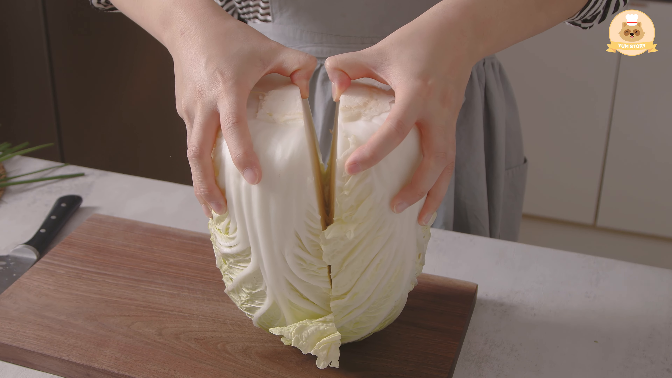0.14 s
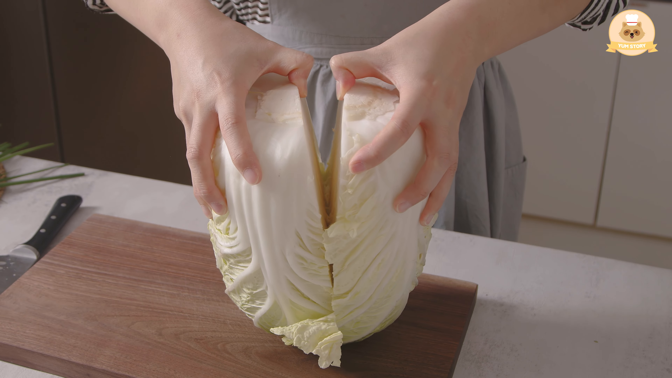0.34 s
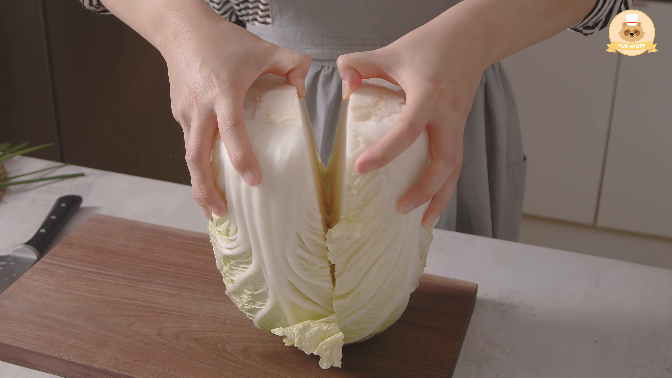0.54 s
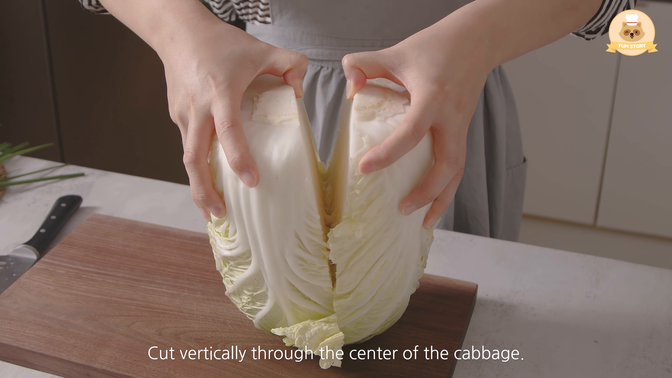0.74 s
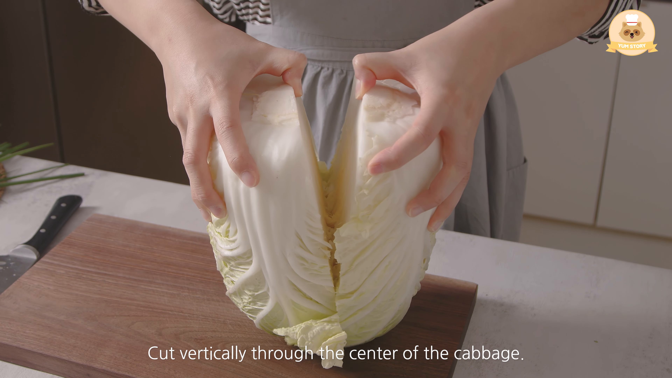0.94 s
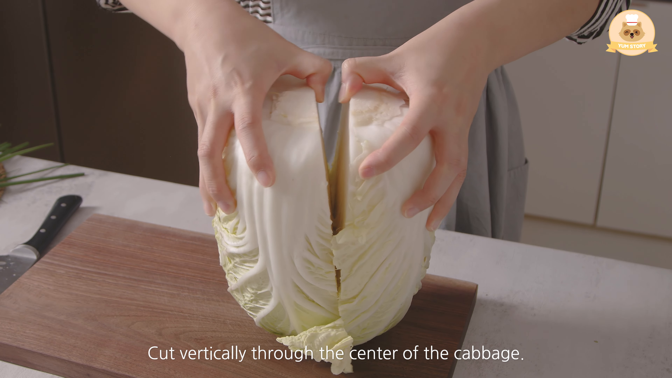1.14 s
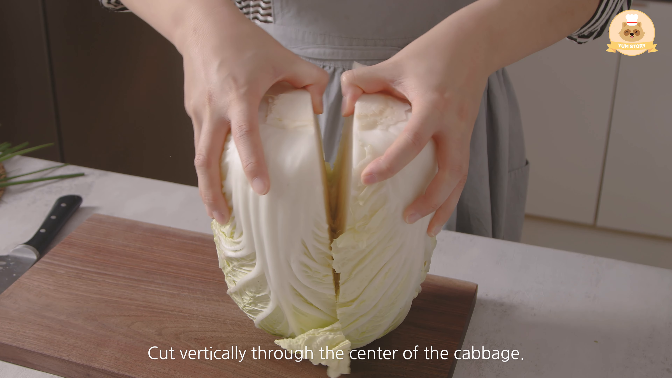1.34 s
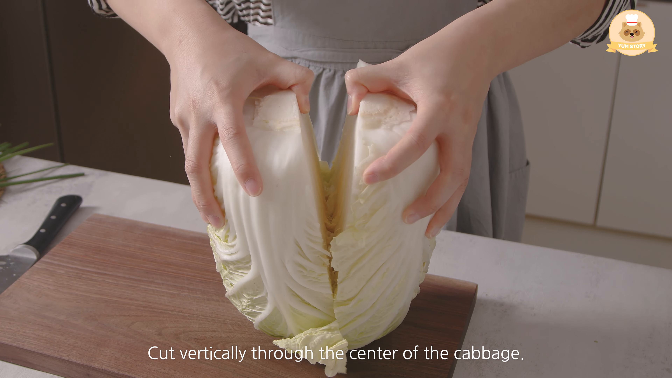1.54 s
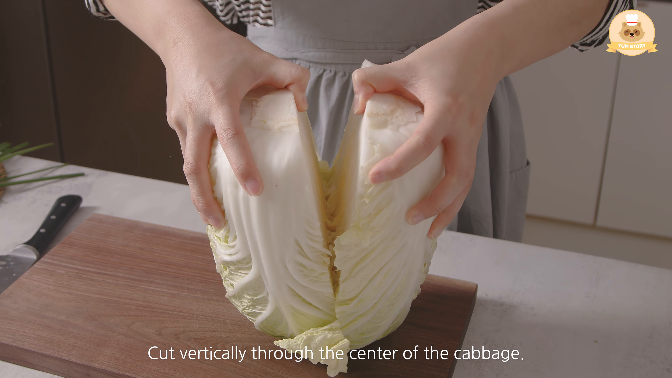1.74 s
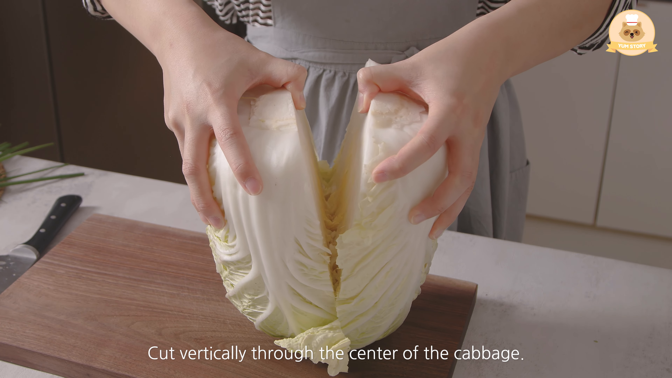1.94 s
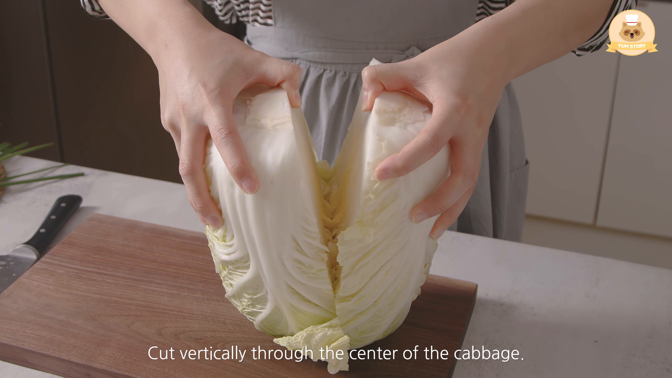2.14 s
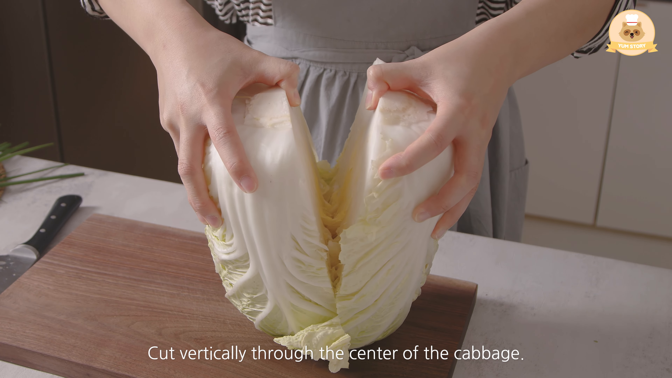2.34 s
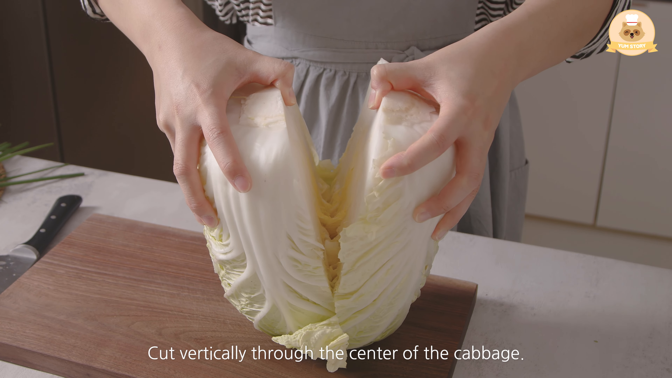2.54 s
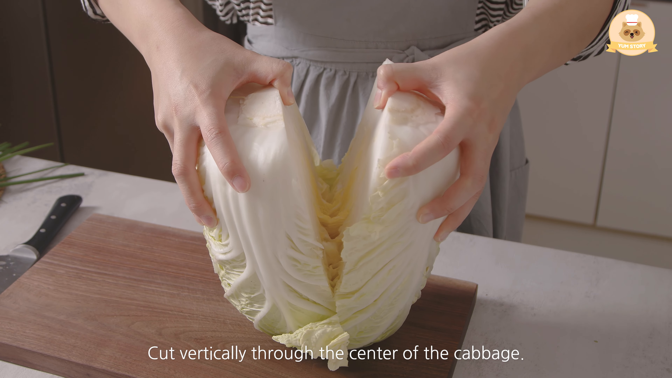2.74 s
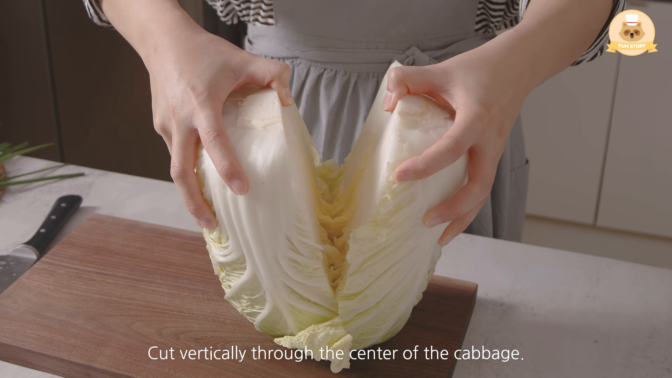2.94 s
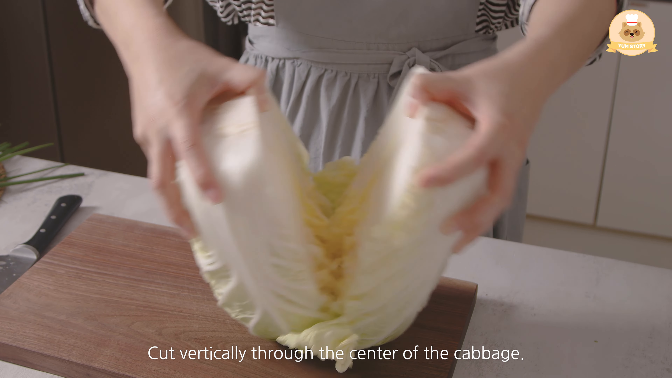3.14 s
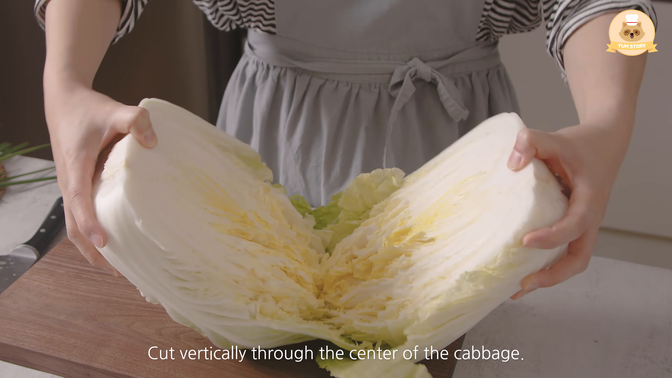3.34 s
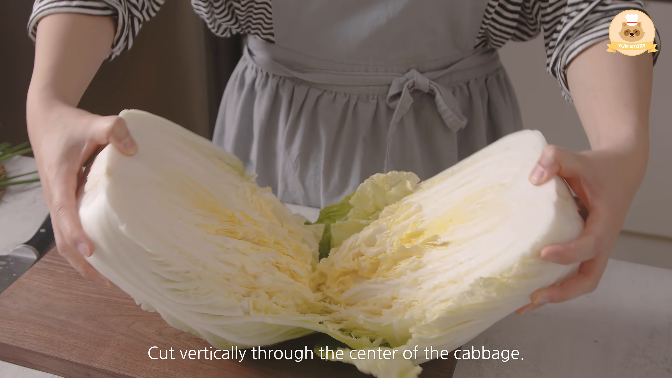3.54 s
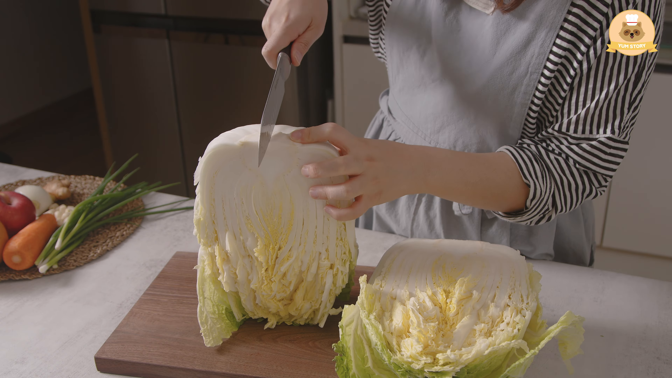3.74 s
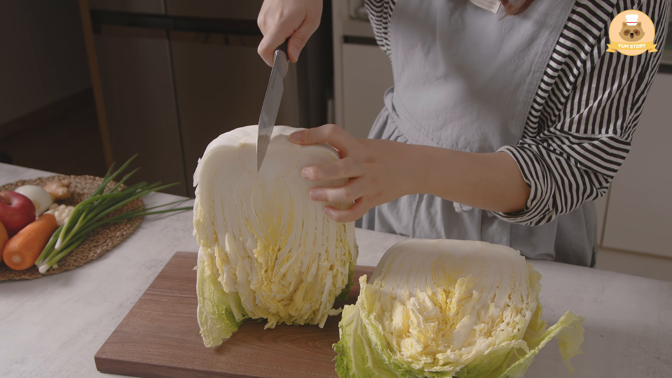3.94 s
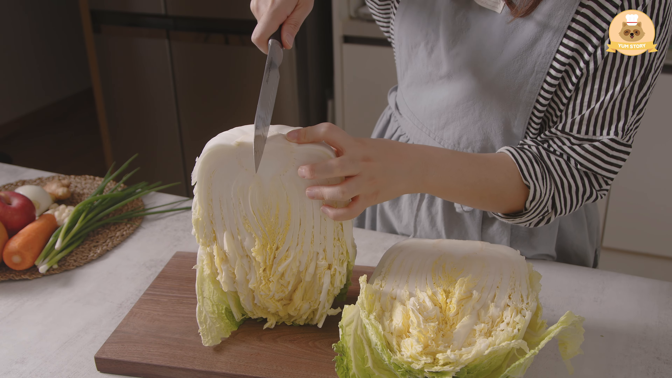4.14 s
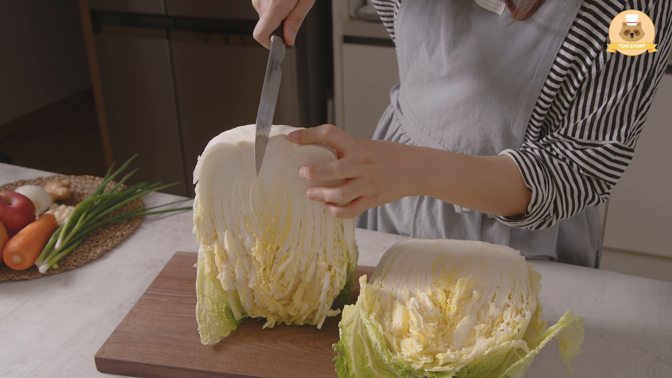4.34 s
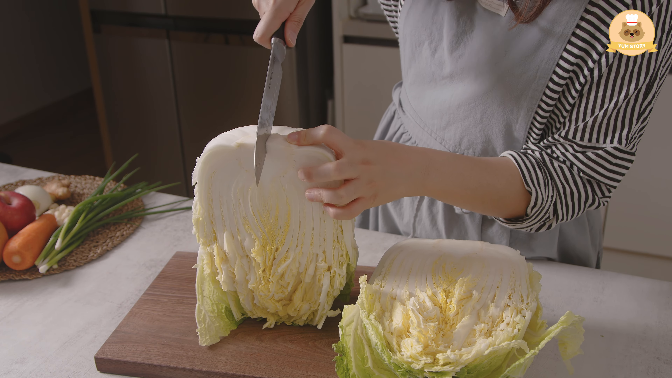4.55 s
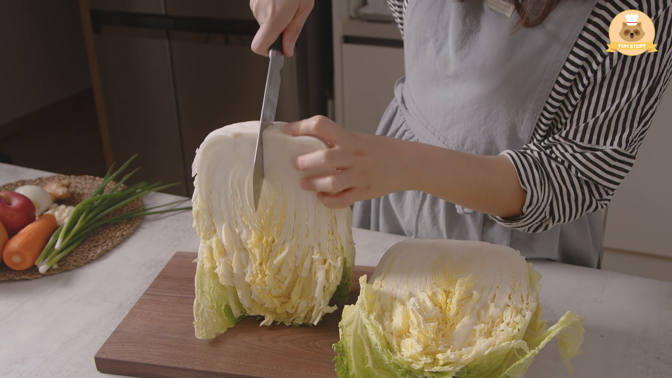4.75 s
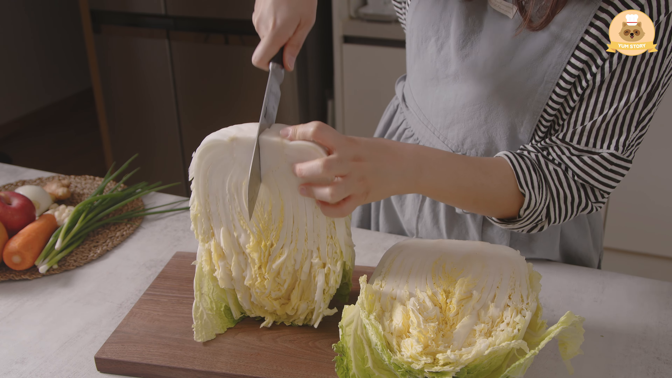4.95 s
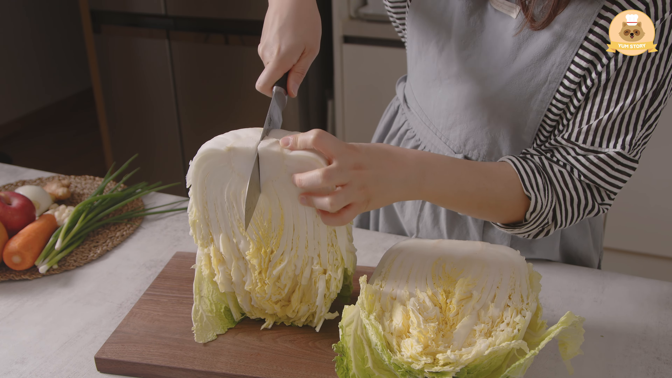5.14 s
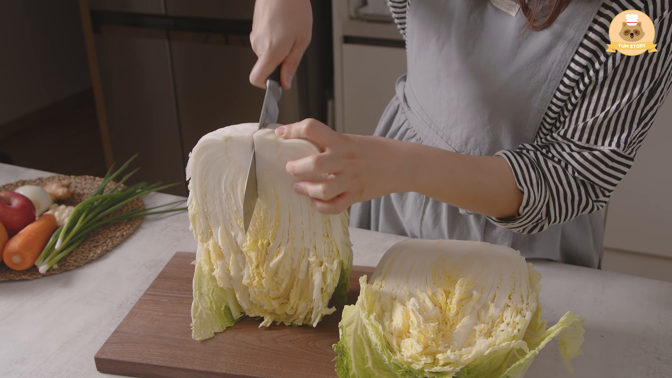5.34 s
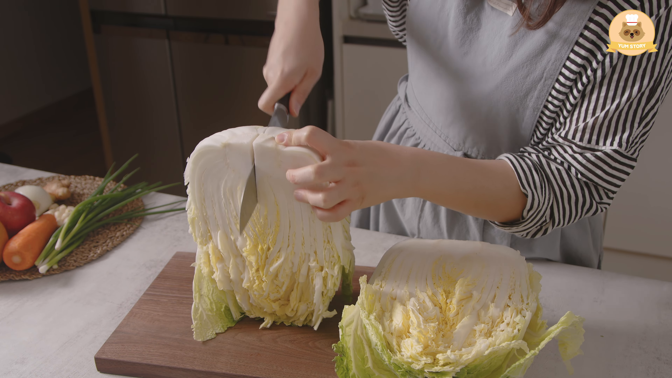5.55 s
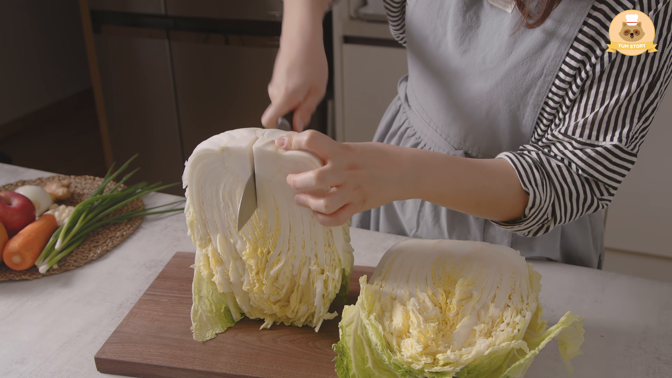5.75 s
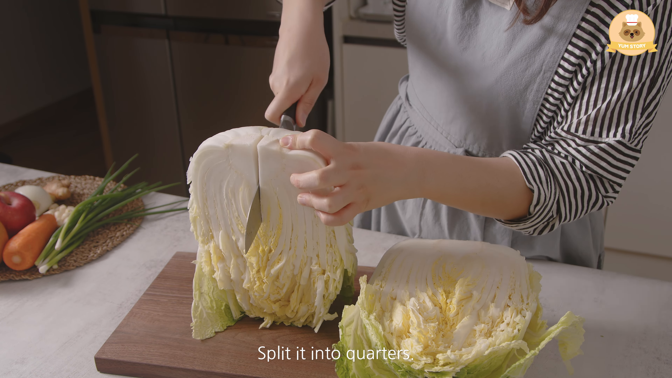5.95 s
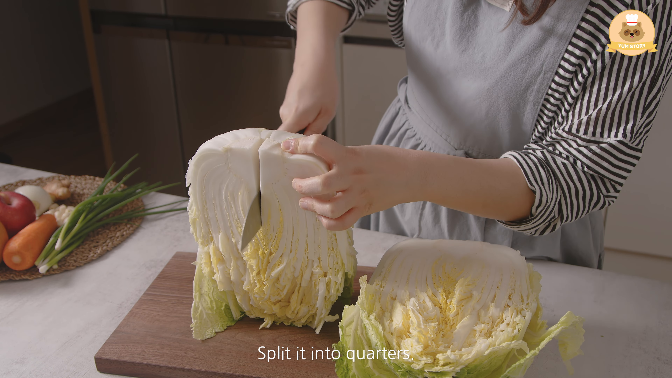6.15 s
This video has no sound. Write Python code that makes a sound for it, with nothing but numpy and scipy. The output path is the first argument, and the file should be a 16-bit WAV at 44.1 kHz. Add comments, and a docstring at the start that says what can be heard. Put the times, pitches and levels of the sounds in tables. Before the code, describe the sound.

Hands pull a large cabbage apart in a quiet kitchen. Its ribs snap and its leaves tear in irregular crisp spurts, with small hollow pops from inside the head. The cracking builds to one loud crunching rip, followed by a brief leaf creak. Then a knife ticks lightly against the core with a faint metallic ring and slices down in several softer, hissing, crunchy strokes. Everything sounds close, over a very faint fridge hum.

```python
"""Tearing and slicing a cabbage

Hands pull a big cabbage apart on a board: ribs snap by brittle fracture, leaves tear and creak by
stick-slip, and the hollow head thuds. The scene changes abruptly to a knife that ticks on the core,
rings faintly in its bending modes and slices down in strokes. A near wall echoes each snap,
the microphone stand sways, and a fridge hums in the kitchen."""
import sys
import numpy as np
from scipy import signal
from scipy.fft import rfft, irfft, next_fast_len
from scipy.io import wavfile
from scipy.ndimage import uniform_filter1d

SR = 44100
rng = np.random.default_rng(int(sys.argv[2]) if len(sys.argv) > 2 else 0)


def file_out(sig):
    """Save sig as 16-bit WAV at sys.argv[1]."""
    # one column per channel
    cols = np.atleast_2d(sig).T
    # limit, then scale
    lim = np.clip(cols, -1, 1)
    pcm = np.round(lim * 32767).astype(np.int16)
    wavfile.write(sys.argv[1], SR, pcm)


N = 272979
TIME = np.arange(N) / SR
KNIFE_START_S = 3.78

# spectrum of tissue breaking under the hands: f/Hz, spectral level/dB
TEAR_SPECTRUM = [(1880, -44), (3200, -9.5), (4450, -7), (4800, -3.5), (6670, -1), (9790, -12.5),
                 (12100, -12.5), (13900, -19.5), (15800, -27.5), (16500, -37)]


def amp(db):
    """Amplitude ratio of a level in decibels."""
    return 10 ** (np.asarray(db) / 20)


def unit(x):
    """Normalisation to an rms of 1."""
    return x / np.sqrt(np.mean(x ** 2) + 1e-20)


def along(points, hz):
    """Interpolation of (f, value) points on a logarithmic frequency axis."""
    f, values = np.transpose(points)
    return np.interp(np.log(hz + 1), np.log(f + 1), values)


def curves(rows):
    """Linear interpolation in time: one curve for each column after t."""
    times, *columns = np.transpose(rows)
    return [np.interp(TIME, times, column) for column in columns]


def filtered(x, response):
    """Linear filtering: the spectrum is multiplied by a frequency response."""
    size = next_fast_len(N + SR // 2)
    return irfft(rfft(x, size) * response(np.fft.rfftfreq(size, 1 / SR)), size)[:N]


def shaped_noise(spectrum):
    """Spectral shaping of white noise, at an rms of 1."""
    return unit(filtered(rng.standard_normal(N), lambda f: amp(along(spectrum, f))))


def minimum_phase(x, spectrum):
    """Minimum-phase filtering: folding the cepstrum gives the most compact causal response."""
    magnitude = np.maximum(amp(along(spectrum, np.fft.rfftfreq(2048, 1 / SR))), 1e-4)
    cepstrum = irfft(np.log(magnitude))
    cepstrum[1:1024] *= 2
    cepstrum[1025:] = 0
    impulse = irfft(np.exp(rfft(cepstrum)))[:1024]
    return signal.fftconvolve(x, impulse / np.linalg.norm(impulse))[:N]


def resonate(x, modes):
    """Modal superposition: x drives damped resonators in parallel."""
    return filtered(x, lambda f: sum(amp(db) * 1j * f * width / (hz * hz - f * f + 1j * f * width)
                                     for hz, width, db in modes))


def swells(start, hold, rise, fall, floor_db, *levels_db):
    """Power summation of events that rise, hold and fall (dB/s) over a floor; a gain per level column."""
    t = np.arange(0, N / SR + .002, .001)[:, None]
    shape_db = -rise * np.maximum(start - t, 0) - fall * np.maximum(t - start - hold, 0)
    powers = [amp(2 * floor_db) + amp(2 * (shape_db + db)).sum(axis=1) for db in levels_db]
    return [np.interp(TIME, t[:, 0], np.sqrt(power)) for power in powers]


def kitchen():
    """Background noise: steady air, a hiss that is stronger in the knife scene, and the fridge's tones."""
    # air noise and faint hiss: f/Hz, spectral level/dB
    air_spectrum = [(20, -17), (40, -6.5), (120, -14), (180, -17), (270, -3), (340, -10), (455, -5.5),
                    (610, -24), (1000, -35.5), (1320, -28.5), (1600, -36), (4000, -50.5), (16000, -63.5)]
    hiss_spectrum = [(2000, -32), (4500, -13), (7300, 0.5), (9000, -10), (16000, -2.5)]
    # fridge tones: f/Hz, rms level/dB
    tones = [(60, -73.5), (119, -77), (1330, -83.5)]
    air = amp(-67) * shaped_noise(air_spectrum)
    hiss = amp(np.where(TIME < KNIFE_START_S, -89.5, -75)) * shaped_noise(hiss_spectrum)
    phase_drifts = 0.0069 * np.cumsum(rng.standard_normal((len(tones), N)), axis=1)
    hum = sum(np.sqrt(2) * amp(db) * np.sin(2 * np.pi * hz * TIME + drift)
              for (hz, db), drift in zip(tones, phase_drifts))
    return air + hiss + hum


def grains(per_s, spread_db, life_s, hiss):
    """Shot noise: tiny fractures at random moments, each a decaying burst with echoes, over smooth hiss."""
    onsets = rng.random(N) < per_s / SR
    sizes = onsets * amp(spread_db * np.minimum(rng.exponential(size=N), 3))
    bursts = signal.lfilter([1], [1, -np.exp(-1 / (life_s * SR))], wall_echoes(sizes))
    return (unit(bursts) + hiss) / np.sqrt(1 + hiss ** 2) * rng.standard_normal(N)


def fracture_gains(events, fall_db_per_s, floor_db):
    """Exponential envelopes of crackle, crunch and thud; the last two decay a little more slowly."""
    start, hold, db, rise, crunch_db, thud_db = np.transpose(events)
    crackle = swells(start, hold, rise, fall_db_per_s, floor_db, db)
    body = swells(start, hold, rise, 0.91 * fall_db_per_s, floor_db, db + crunch_db, db + thud_db)
    return *crackle, *body


def flesh(gains, crackle_spectrum, crunch_spectrum, per_s, spread_db, hiss):
    """Source and filter: one stream of fractures sounds in the air, the crisp ribs and the hollow head."""
    # resonances of the head: f/Hz, bandwidth/Hz, level/dB
    head_modes = [(185, 30, 0), (272, 55, 5.5), (355, 56.1, 4), (438, 11, -10.5)]
    crackle_gain, crunch_gain, thud_gain = gains
    merged = hiss * (crackle_gain / amp(-48)) ** 0.28  # harder tearing merges the fractures into hiss
    fractures = grains(per_s, spread_db, life_s=0.00038, hiss=merged)
    crackle = unit(minimum_phase(fractures, crackle_spectrum))
    crunch = unit(minimum_phase(fractures, crunch_spectrum))
    head = resonate(fractures, head_modes)
    thud = unit(filtered(head, lambda f: f ** 2 / (f ** 2 + 130 ** 2)))  # high-pass
    return crackle_gain * crackle + crunch_gain * crunch + amp(-5) * thud_gain * thud


def tearing():
    """Crack propagation: leaves rip in surges of small fractures. Returns sound and crackle envelope."""
    # rips: t/s at full level, hold/s, crackle level/dB, rise/(dB/s), relative crunch/dB, relative thud/dB
    rips = [(.005, 0.038, -56, 407, -18, 9), (.121, 0.041, -46, 2500, -29, -25),
            (.177, 0.0014, -41.5, 505, 5, 5), (.355, 0.039, -53.5, 1500, -18, -10),
            (.393, 0.034, -48.5, 1500, -9.5, -7), (.493, 0.0071, -57.5, 1198, 10.5, 11),
            (.53, 0.029, -45.5, 601, -5, 7), (.63, 0.0071, -48.5, 1499, 2.5, 9),
            (.68, 0.048, -43.5, 399.5, 1.5, 2.5), (.77, 0.008, -54.5, 300, 3.5, -7),
            (.29, 0.033, -62, 200, -3, 7), (.85, 0.16, -56, 198, 3, 3),
            (.942, 0.0068, -43.5, 2000, 11.5, 12), (.98, 0.013, -35, 800.5, 3, 9),
            (1.028, 0.0042, -37.5, 901, 3, 3.5), (1.166, 0.023, -52, 2500, -19, -4.5),
            (1.25, 0.025, -81, 200, 2, 22), (1.661, 0.034, -61.5, 696, -25, -13),
            (1.709, 0.0022, -39, 1703, 0.5, 2.5), (1.765, 0.015, -45.5, 500, 0, 0),
            (1.822, 0.048, -46.5, 900.5, 4, 6.5), (1.928, 0.0017, -41.5, 350, -1, 2.5),
            (2.065, 0.03, -45, 222, 0, -6), (2.115, 0.022, -34.5, 2500, 1.5, 5.5),
            (2.17, 0.0083, -37, 600, 5, 11), (2.24, 0.0099, -45, 600, 5, 2.5),
            (2.356, 0.072, -40, 720, -2, 7.5), (2.47, 0.05, -45, 300, 0, -7),
            (2.595, 0.063, -35.5, 380, -0.3, 4.5), (2.832, .01, -48.5, 142, 0.5, -2),
            (2.885, 0.028, -41.5, 3000, 0, 1), (2.914, 0.042, -36, 900, 2.5, 8.5),
            (3.029, 0.0069, -40, 897.5, 5.5, 9), (3.085, .05, -38.5, 498.5, 2, 2),
            (3.142, 0.051, -25.5, 2998.5, 0, 4), (3.17, 0.067, -23.5, 1204, 2.4, 7),
            (3.28, 0.024, -28, 302.5, 0.5, 2), (3.36, 0.055, -41, 144, -2.5, 0.5),
            (3.47, 0.027, -55.5, 158, 9, 6), (3.703, 0.034, -33, 130, -18, -15.5)]
    # crunch of torn ribs: f/Hz, spectral level/dB
    crunch_spectrum = [(380, -30), (560, 4), (740, -0.5), (830, 2), (980, -8), (1260, -3), (2000, -6),
                       (2800, -9.5), (4200, -24), (7000, -56.5)]
    gains = fracture_gains(rips, fall_db_per_s=216, floor_db=-76)
    return flesh(gains, TEAR_SPECTRUM, crunch_spectrum, per_s=300, spread_db=4.5, hiss=0.75), gains[0]


def hollow_pops():
    """Cavity resonance: each pop is one damped air mode of the head, with a soft onset."""
    # pops, pitched by the gap between the halves: t/s, level/dB, f/Hz
    pops = [(0.01, -29, 347), (0.038, -38, 360), (0.147, -39, 393), (0.175, -28, 482), (0.214, -35, 377),
            (0.366, -46.5, 393), (0.492, -35, 270), (0.516, -40, 269), (0.532, -34, 247), (0.563, -32, 268),
            (0.63, -31, 263), (0.684, -30, 248), (0.719, -43, 280), (0.744, -39, 264), (0.94, -20.5, 285),
            (0.956, -27, 414), (0.979, -14, 294), (1.027, -15.5, 276), (1.052, -24, 256), (1.101, -34, 284),
            (1.228, -32.5, 237), (1.709, -26, 279), (1.737, -34, 355), (1.775, -26, 265), (1.842, -33, 260),
            (1.91, -30, 333), (1.934, -30.5, 252), (2.113, -35, 480), (2.131, -21.5, 252), (2.17, -13, 289),
            (2.191, -26.5, 385), (2.234, -24.5, 252), (2.343, -29, 222), (2.358, -27, 386),
            (2.377, -23, 360), (2.414, -21.5, 344), (2.437, -26, 340), (2.589, -18, 222),
            (2.605, -17.5, 217), (2.632, -16, 261), (2.681, -31, 285), (2.884, -27.5, 287),
            (2.915, -12, 278), (2.947, -19, 254), (3.027, -20.5, 380), (3.055, -30, 371),
            (3.085, -29.5, 237), (3.107, -19, 305), (3.141, -15, 433), (3.166, -9.5, 444), (3.179, -5, 256),
            (3.192, -18, 303), (3.208, -16, 236), (3.237, -20, 360), (3.289, -33, 377), (3.319, -33, 229),
            (3.344, -28, 400), (3.399, -31.5, 308), (3.427, -41, 258), (5.065, -43.5, 469),
            (5.138, -39.5, 271), (5.156, -41, 287), (5.191, -40.5, 159), (5.47, -37.5, 416),
            (5.501, -39, 470), (5.528, -43, 420), (5.777, -35.5, 490), (5.786, -25.5, 262),
            (5.815, -30, 272), (5.836, -32, 272), (5.922, -33.5, 474), (5.942, -31.5, 457),
            (5.965, -40, 165), (6.118, -25.5, 447), (6.148, -27, 248)]
    t60_s, onset_s = 0.056, .0015
    out, t = np.zeros(N + SR), np.arange(SR // 5) / SR
    for start, db, hz in pops:
        envelope = amp(db + 0.5 - 60 * t / t60_s) * (1 - np.exp(-t / onset_s))
        out[round(start * SR):][:len(t)] -= envelope * np.sin(2 * np.pi * hz * t)
    return out[:N]


def rib_snaps(small_breaks):
    """Brittle fracture: each rib or fibre gives a noise burst, a pitched snap and a longer, lower knock."""
    # the loudest ribs breaking: t/s, level/dB, snap f/Hz, relative knock level/dB, knock f/Hz
    ribs = [(0.0104, -23.5, 5400, -12.5, 797), (0.0314, -34, 7240, -14.5, 781),
            (0.0563, -29, 6840, -30, 805), (0.0764, -39, 6150, -22, 824), (0.1014, -41, 6180, -22, 1230),
            (0.1196, -32, 6100, -35, 1130), (0.1321, -23.5, 6900, -32, 1290),
            (0.1431, -21, 6100, -14, 1720), (0.1674, -28.5, 6550, 5.5, 2100), (0.1715, -12, 6770, -7, 1140),
            (0.2319, -26, 6180, -10, 1500), (0.3082, -41.5, 7320, -6, 1220), (0.3326, -43, 4620, -7, 1740),
            (0.3541, -36, 6700, -13, 1320), (0.3656, -28.5, 7540, -15, 2400), (0.379, -31, 6890, -11, 1740),
            (0.3915, -23, 4350, -11, 1520), (0.4334, -31, 6070, -8, 2060), (0.4569, -35.5, 4080, -12, 1090),
            (0.4908, -32, 5770, -5, 813), (0.5267, -25.5, 6700, -14, 872), (0.5574, -22, 6800, -11, 1300),
            (0.628, -18.5, 6820, -20, 2600), (0.6504, -18, 6340, -34, 1420), (0.6719, -22, 5400, -5.5, 837),
            (0.6938, -21.5, 7040, -9, 2350), (0.7024, -28, 5760, -2, 850), (0.7188, -21, 8540, -17, 802),
            (0.7444, -36, 5810, 4, 838), (0.7696, -26, 6800, -11, 2020), (0.7971, -40, 6760, 2, 1000),
            (0.8404, -34, 6300, -9, 999), (0.8864, -31.5, 8500, -1.5, 2560), (0.9043, -33, 8200, -11, 859),
            (0.9388, -19, 4750, 1.5, 1290), (0.9787, -11, 7200, -6.5, 2600), (1.0266, -11.5, 7200, -2, 845),
            (1.1653, -28, 6300, -14.5, 2380), (1.2274, -47, 6620, 10, 1290),
            (1.3274, -47.5, 6600, -19, 1510), (1.6576, -34.5, 6270, -29, 1330),
            (1.703, -24.5, 5600, 4, 1280), (1.7244, -28, 6560, 1, 1050), (1.7594, -30, 6550, -6, 1940),
            (1.7749, -20.5, 6490, -11, 853), (1.8198, -22.5, 5400, -6, 1520),
            (1.8412, -28, 6640, 7.5, 1240), (1.9001, -32, 5750, 3, 1290), (1.9305, -24, 6330, -11, 1520),
            (2.0268, -28.5, 6520, -4, 1490), (2.0564, -26.5, 8800, 0, 1730), (2.0744, -32, 5450, 7.5, 832),
            (2.0884, -24.5, 7070, 0.5, 1920), (2.1126, -11, 5480, -8.5, 1510),
            (2.169, -17.5, 6700, 0, 1130), (2.1904, -13.5, 6800, -6, 934), (2.2374, -38, 6340, 2, 934),
            (2.2453, -16.5, 6160, -16, 791), (2.2932, -34, 6600, 4.5, 856), (2.3391, -16, 6500, -8, 853),
            (2.359, -9.5, 6320, -13, 883), (2.4074, -17, 6500, -4, 802), (2.4164, -20, 5700, 1.5, 1120),
            (2.4384, -21.5, 5740, 0.5, 781), (2.4748, -34, 6070, 0, 834), (2.4924, -25, 5690, -12, 1200),
            (2.5184, -37, 6550, -25, 813), (2.5864, -21, 6240, -14, 802), (2.6319, -18.5, 4840, -1.5, 851),
            (2.6793, -24.5, 7500, -8, 1210), (2.8499, -34, 6550, -6.5, 1220),
            (2.8833, -15, 6400, -24, 1010), (2.9128, -14.5, 6000, -6, 2240),
            (2.9392, -16.5, 7600, -17.5, 872), (2.9624, -23, 7890, -4, 1280), (3.028, -28, 6240, 5, 1350),
            (3.1063, -24.5, 6440, 5, 1490), (3.1398, 1, 6470, -15, 1270), (3.1662, -2.5, 6100, -8, 802),
            (3.3804, -27, 7020, -7, 1650), (3.4164, -27.5, 6900, -11, 1640), (3.465, -31, 6740, -9.5, 1460),
            (3.485, -25, 6640, -7.5, 2300), (3.5114, -36, 6460, -10, 1690),
            (3.5563, -30.5, 6600, -15, 1910), (3.689, -5, 6350, -32, 1640), (3.7644, -25.5, 6400, -7, 2540),
            (4.5544, -15, 7250, -4.5, 1540), (5.2929, -43, 5190, -30, 822),
            (5.4744, -20, 7300, -21.5, 2040), (5.4969, -20.5, 6100, -9, 2120),
            (5.6301, -27, 6760, -19, 2360), (5.7359, -42, 7800, -3, 1400), (5.7548, -30, 5980, -5, 1300),
            (5.9234, -30, 7100, -5, 781), (5.9434, -32.5, 7340, 4, 1660), (5.9914, -36, 6150, 0, 851),
            (6.0357, -37, 5800, -3, 1110), (6.0985, -16, 6400, -15, 851)]
    burst_t60_s, snap_t60_s, knock_t60_s = 0.0031, 0.0088, 0.015
    breaks = np.vstack([ribs, small_breaks])
    t = np.arange(500) / SR
    onset = 1 - np.exp(-t / .0001)
    bursts, rings = np.zeros((2, N + SR))
    for start, db, snap_hz, knock_db, knock_hz in breaks:
        noise, snap_jitter, knock_jitter = rng.standard_normal((3, len(t)))
        snap_phase = 2 * np.pi * snap_hz * t + 0.18 * np.cumsum(snap_jitter)
        knock_phase = 2 * np.pi * knock_hz * t + 0.074 * np.cumsum(knock_jitter)
        snap = amp(-4.5 - 60 * t / snap_t60_s) * np.sin(snap_phase)
        knock = amp(knock_db - 2 - 60 * t / knock_t60_s) * np.sin(knock_phase)
        i = round(start * SR)
        bursts[i:i + len(t)] += amp(db - 7 - 60 * t / burst_t60_s) * noise
        rings[i:i + len(t)] += amp(db) * (snap - knock) * onset
    return minimum_phase(bursts, TEAR_SPECTRUM) + rings[:N]


def fibre_breaks(rip_gain, count=70):
    """Random fracture: rows for rib_snaps of small breaks, louder where the tearing is stronger."""
    times = KNIFE_START_S * rng.random(count)
    level_scatter, snap_scatter, knock_scatter, pitch_scatter = rng.standard_normal((count, 4)).T
    rip_db = 20 * np.log10(rip_gain[(times * SR).astype(int)])
    db = -32.5 + .7 * (rip_db + 45) + 6 * level_scatter
    db -= 60 * (rip_db < -68)  # inaudible in very weak tearing
    snap_hz = 6340 * np.exp(0.11 * snap_scatter)
    knock_db = -13.5 + 7 * knock_scatter
    knock_hz = 1350 * np.exp(.3 * pitch_scatter)
    return np.transpose([times, db, snap_hz, knock_db, knock_hz])


def wall_echoes(x):
    """Early reflections: delayed, weaker copies add to the direct sound."""
    # echoes from near surfaces: delay/s, level/dB
    echoes = [(.0045, -8), (.0093, -16), (.0127, -18)]
    return x + sum(amp(db) * np.pad(x, (round(delay * SR), 0))[:N] for delay, db in echoes)


def room(x):
    """Reverberation: each frequency decays at its own rate; each quarter second gets its own noise tail."""
    # reverberation times: f/Hz, T60/s
    decay_times = [(150, 0.37), (1000, 0.09), (6000, 0.07), (15000, 1)]
    out, step, delay = np.zeros(N + SR), SR // 4, 300  # step and delay in samples
    for i in range(0, N, step):
        hz, t, noise = signal.stft(rng.standard_normal(SR // 2), SR, nperseg=256)
        decay = amp(-60 * t / along(decay_times, hz)[:, None])
        tail = signal.istft(noise * decay, SR, nperseg=256)[1]
        wet = signal.fftconvolve(x[i:i + step], tail / np.linalg.norm(tail))
        out[i + delay:][:len(wet)] += wet[:N + SR - i - delay]
    return out[:N]


def stand(sway_hz=23):
    """Structure-borne sound: jolts sway the microphone stand and send a dull rumble through its mount."""
    # jolts: t/s at full sway, hold/s, sway level/dB, rumble level/dB
    jolts = [(0.316, .01, -53, -65), (0.83, 0.0086, -68, -65), (1.28, 0.15, -32.5, -51),
             (1.998, .01, -77, -60), (2.184, 0.068, -51, -58), (2.285, .02, -44, -69),
             (2.433, .01, -64, -74), (2.625, 0.008, -58, -59), (3.219, .01, -45, -23),
             (3.231, 0.016, -27.5, -34.5), (3.42, 0.059, -58, -65), (3.74, .01, -59, -75),
             (4.595, 0.25, -30, -51), (4.91, 0.057, -31.5, -53), (5.069, .12, -39, -51),
             (5.218, 0.15, -40, -53.5), (5.425, 0.26, -43.5, -60), (5.831, 0.11, -41, -50),
             (5.96, .07, -37.5, -64), (6.19, .01, -26, -32)]
    # rumble in the mount: f/Hz, spectral level/dB
    rumble_spectrum = [(20, -25.5), (40, 10), (70, 1.5), (120, -8.5), (180, -35.5)]
    start, hold, sway_db, rumble_db = np.transpose(jolts)
    sway_gain, = swells(start, hold, 350.5, 100.5, -80.5, sway_db)  # rise and fall in dB/s, floor in dB
    rumble_gain, = swells(start - 0.0067, 0, 398.5, 125, -72, rumble_db)  # peaks just ahead of the sway
    sway = np.sqrt(2) * np.sin(2 * np.pi * sway_hz * TIME)
    return sway_gain * sway + rumble_gain * shaped_noise(rumble_spectrum)


def leaf_creak():
    """Stick-slip friction: near-regular slips of like size ring the leaf's broad resonances."""
    # a leaf slipping as the halves part: t/s, slip rate/Hz, level/dB
    slipping = [(3.59, 390, -51), (3.61, 326, -44), (3.64, 450, -39.5), (3.665, 360, -40),
                (3.686, 310, -33), (3.72, 570, -42), (3.778, 167, -35.5)]
    # resonances of the leaf: f/Hz, bandwidth/Hz, level/dB
    leaf_modes = [(3370, 2400, -4), (6350, 440, 7), (12730, 1800, -31)]
    rate, db = curves(slipping)
    unsteady = 1 + .1 * unit(uniform_filter1d(rng.standard_normal(N), 100))
    slip_count = np.floor(np.cumsum(rate * unsteady) / SR)
    slips = np.diff(slip_count, prepend=0) * amp(2.5 * rng.standard_normal(N))
    return amp(db) * unit(resonate(slips, leaf_modes)) * (TIME > slipping[0][0])


def slicing():
    """Fracture under a wedge: each stroke breaks tissue densely. Returns sound and crackle envelope."""
    # knife strokes at and through the core:
    # t/s at full level, hold/s, crackle level/dB, rise/(dB/s), relative crunch/dB, relative thud/dB
    strokes = [(3.785, 0.076, -65, 302.5, -9.5, -12), (4.05, 0.06, -75, 148, -20, -3),
               (4.134, .02, -63, 501, -23.5, -6), (4.24, 0.045, -86, 300, -13, -5),
               (4.41, .03, -66.5, 3000, -26.5, -13), (4.451, 0.057, -54.5, 500, -24, -7.5),
               (4.549, 0.0038, -34, 1500, -9.5, -31), (4.63, 0.031, -54.5, 300, -5.5, -19),
               (4.729, 0.049, -31.5, 395, -17.5, -30), (5.011, .13, -50, 121, -10, -8.5),
               (5.298, 0.0027, -61.5, 169.5, -11.5, -3), (5.463, .06, -40.5, 480.5, -13.5, -9),
               (5.59, .065, -55, 300, -15, -10), (5.801, .01, -33.5, 384, -11.5, -0.5),
               (5.95, 0.0087, -46.5, 137, .8, -8), (6.1, 0.026, -34.5, 495, -6.5, -8.5)]
    # crackle and crunch of the cut: f/Hz, spectral level/dB
    crackle_spectrum = [(1880, -43), (3200, -11.5), (4300, -11), (4900, -6.5), (6850, 0), (9660, -9.5),
                        (12500, -10.5), (15400, -35), (16200, -30), (16500, -35)]
    crunch_spectrum = [(300, -11), (480, 2), (650, -3), (1000, -2), (1600, -3.5), (2400, -3.5), (3000, -8),
                       (4200, -24), (7000, -42)]
    gains = fracture_gains(strokes, fall_db_per_s=258, floor_db=-85.5)
    return flesh(gains, crackle_spectrum, crunch_spectrum, per_s=1100, spread_db=5.5, hiss=1.5), gains[0]


def blade(cut_gain):
    """Forced vibration: touches and scraping ring the steel's modes; its flat hisses along the wet cut."""
    # shares of the slicing: t/s, relative ring level/dB, relative glide level/dB
    shares = [(3.78, -5.5, -14.5), (4.05, 3.5, -14.5), (4.3, 6.5, -25), (4.5, 6.5, -8), (4.56, -5, 1.5),
              (4.66, 0, -1), (4.73, -8, -9.5), (4.9, -15, -6), (5.02, -20, -6.5), (5.15, -22.5, -4),
              (5.3, -32, -18), (5.5, -31, -7), (6.19, -40, -16)]
    # the edge touching the core: t/s, level/dB
    touches = [(3.8421, -42), (3.9185, -55), (3.9973, -58), (4.0238, -51), (4.0442, -46.5), (4.0606, -36.5),
               (4.083, -47.5), (4.114, -42.5), (4.1267, -58), (4.151, -43.5), (4.176, -48), (4.243, -59),
               (4.293, -62), (4.3468, -63.5), (4.368, -54.5), (4.408, -36), (4.4464, -37), (4.4501, -32.5),
               (4.495, -34)]
    # modes of the steel and bands of the gliding hiss: f/Hz, bandwidth/Hz, level/dB
    steel_modes = [(1610, 90, -16), (1810, 80, -15), (4150, 60, -20), (5045, 80, -13), (6200, 90, -9),
                   (6970, 22, 5), (7460, 70, -9), (7770, 60, -1), (8484, 50, -8), (8742, 50, -7),
                   (9620, 90, -11), (10770, 35, -10), (12160, 45, -6), (13520, 50, -7), (13760, 35, -6),
                   (14810, 35, -9), (15665, 30, -15)]
    glide_bands = [(1720, 850, 2.5), (7640, 1100, -10), (13300, 3100, 1)]
    ring_db, glide_db = curves(shares)
    stroke = cut_gain * (TIME > KNIFE_START_S)
    scrape = grains(per_s=400, spread_db=3, life_s=.001, hiss=.6)
    force = amp(ring_db) * stroke * scrape
    tick_decay = amp(-60 * TIME[:100] / .002)
    for start, db in touches:
        force[round(start * SR):][:100] += amp(db + 5.5) * tick_decay * rng.standard_normal(100)
    ring = resonate(force, steel_modes) / np.std(resonate(scrape, steel_modes))
    friction = resonate(rng.standard_normal(N), glide_bands)
    glide = unit(resonate(friction, glide_bands))  # a second pass sharpens the bands
    return ring + amp(glide_db) * stroke * glide


def in_room(snaps, pops):
    """Direct and reflected sound: the snaps echo off the wall, and both snaps and pops reverberate."""
    return wall_echoes(snaps) + pops + room(amp(-9.5) * snaps + amp(-9) * pops)


def scene():
    """Superposition of the sources: tearing, then slicing; the change cuts off the room's tail."""
    by_hand = TIME < KNIFE_START_S
    rips, rip_gain = tearing()
    cuts, cut_gain = slicing()
    snaps, pops = rib_snaps(fibre_breaks(rip_gain)), hollow_pops()
    hands = in_room(snaps * by_hand, pops * by_hand) + rips + leaf_creak()
    knife = in_room(snaps * ~by_hand, pops * ~by_hand) + cuts + blade(cut_gain)
    return (np.where(by_hand, hands, knife) + stand() + kitchen())[None]


def record(dry):
    """Saturation and band limiting: the loudest peaks are softly clipped ahead of a steep low-pass."""
    ceiling, cutoff_hz = .93, 15800
    clipped = dry[0] / (1 + np.abs(dry[0] / ceiling) ** 6) ** (1 / 6)
    return filtered(clipped, lambda hz: 1 / (1 + (hz / cutoff_hz) ** 120))[None]


dry = scene()
out = record(dry)
file_out(out)
```